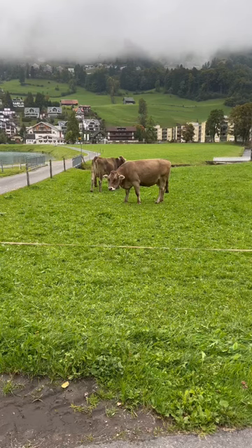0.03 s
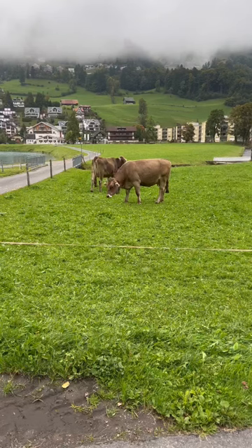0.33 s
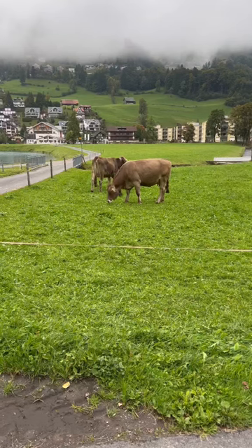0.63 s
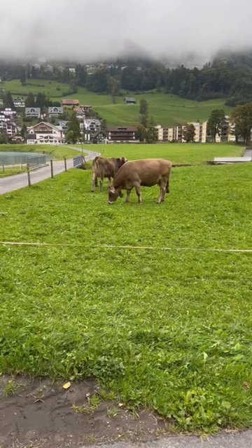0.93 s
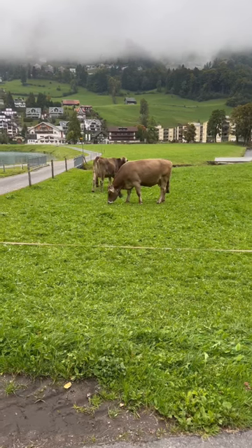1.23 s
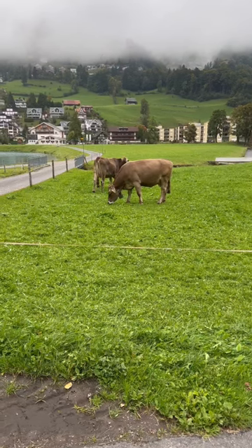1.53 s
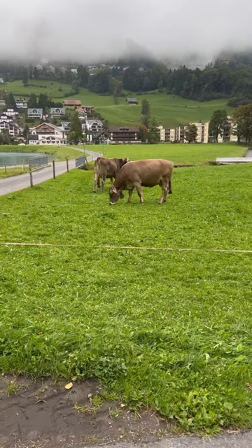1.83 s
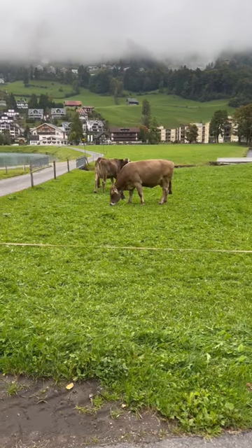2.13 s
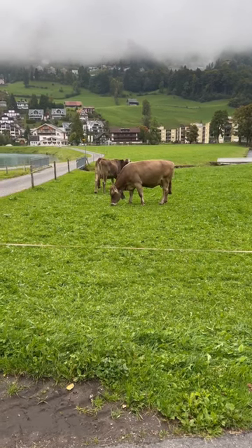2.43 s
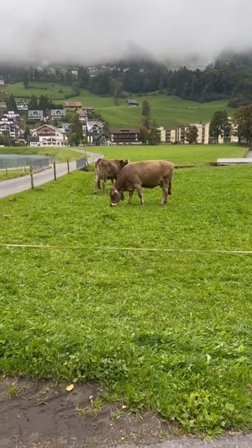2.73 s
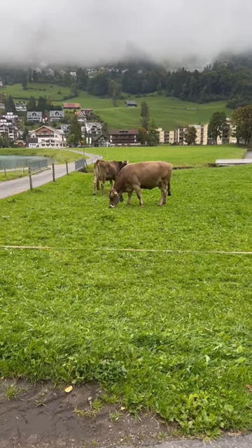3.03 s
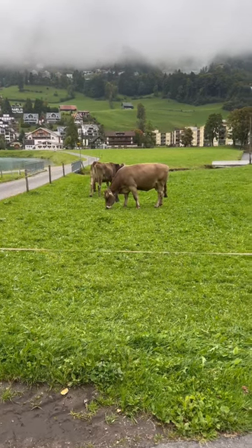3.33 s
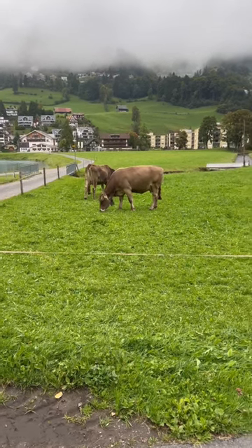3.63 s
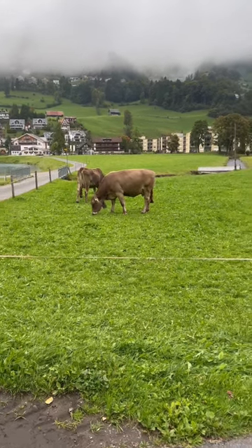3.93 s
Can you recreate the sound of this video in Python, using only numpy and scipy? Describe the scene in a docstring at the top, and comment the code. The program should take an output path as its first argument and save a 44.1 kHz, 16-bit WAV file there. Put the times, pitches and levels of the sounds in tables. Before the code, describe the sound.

Several metal bells on grazing cows clonk and jangle unevenly over faint outdoor air.

```python
"""An open meadow, where grazing cows clank their sheet-metal bells as they move their heads. Each clapper
impact sets the air in the bell's cavity sounding, a short hollow clonk, and excites the damped normal modes of
the shell: a long ring and a bright sizzle of high modes. More bells tinkle far off, and the surroundings
scatter a faint echo. Underneath lie steady air, a low valley rumble and light gusts on the microphone."""
import sys
import numpy as np
from scipy import signal
from scipy.fft import rfft, irfft, next_fast_len
from scipy.io import wavfile

SR = 44100
rng = np.random.default_rng(int(sys.argv[2]) if len(sys.argv) > 2 else 0)


def file_out(sig):
    """Save sig as 16-bit WAV at sys.argv[1]."""
    # one column per channel
    cols = np.atleast_2d(sig).T
    # limit, then scale
    lim = np.clip(cols, -1, 1)
    pcm = np.round(lim * 32767).astype(np.int16)
    wavfile.write(sys.argv[1], SR, pcm)


N = 176400

# Noise spectra: f/Hz, relative spectral level/dB
AIR_SPECTRUM = [(230, -1.5), (450, -12.5), (1000, -21), (5000, -27.5), (10000, -39), (16000, -58)]
RUMBLE_SPECTRUM = [(20, -38), (50, 2.5), (72, -0.5), (120, -2), (300, -17.5)]
GUST_SPECTRUM = [(20, -19), (65, 3.5), (110, -6.5), (250, -31.5), (700, -100)]
CRACK_SPECTRUM = [(400, -17), (3000, -6.5), (11000, -3.5), (16000, -25)]
# Gusts: t/s, Gaussian half width/s, level/dB
WIND_GUSTS = [(2.866, 0.12, -28), (3.025, 0.021, -29.5), (3.196, 0.066, -29), (3.808, 0.018, -26),
              (3.984, 0.011, -24)]
# Decay of the scattered echo: f/Hz, T60/s
ECHO_DECAY = [(300, 0.071), (2500, 1), (15000, 0.16)]
# Spectral envelope of a shell's weak upper modes: f/Hz, relative level/dB
FINE_SPECTRUM = [(1300, -16), (3000, -28.5), (6000, -26.5), (9000, -22), (11500, -30.5), (13500, -32),
                 (16000, -45)]
# Normal modes of each bell: f/Hz, relative level/dB, T60/s before the bell's sustain factor
MAIN_MODES = [(646, -4, .19), (1339, -18, .9), (1555, -9, .16), (1637, -15.5, 1.3), (1806, -14.5, .9),
              (2706, 0, 1.42), (2824, -8, .7), (2940, -7, .55), (3084, -13, .35), (3160, -12, .4),
              (4287, -13, .55), (4438, -11, .45), (4641, -16, .4), (5862, -16.5, .38), (6196, -10, .32),
              (6686, -12, .22), (11800, -20, .19)]
BRIGHT_MODES = [(697, -15, .22), (1432, -24, 1), (1771, -15, 1.18), (2899, 0, 1.2), (3045, -15, 1),
                (3482, -18, 1), (3789, -11, .66), (4577, -10.5, .72), (5004, -11, .57), (5084, -13, .53),
                (6521, -9, .53), (6640, -10, .5), (7195, -13, .55), (7778, -16, .5), (9365, -12, .14),
                (12620, -22, .25)]
TINNY_MODES = [(755, -10, .27), (1841, -9, .42), (2186, -14, .5), (2956, -14, .67), (3676, -13, .5),
               (4543, -10, .51), (5011, -2, .42), (6766, -6, .33)]
SMALL_MODES = [(834, -9, .55), (2090, -12, .92), (3246, 0, .81), (4244, -9, .67), (5197, -10, .71),
               (5865, -9, .65), (7221, -5, .36), (7782, -5, .34), (11300, -11, .25)]
FAINT_MODES = [(548, -8, .15), (1908, 0, .6), (2239, -10, .7), (3240, -3, 1)]
DEEP_MODES = [(489, 0, .19), (2643, -10, .7), (2761, -16, .72), (3725, -10, .62), (4123, -12, .46)]
# Clapper blows: t/s, clonk level/dB, ring level/dB, sizzle level/dB, f/Hz of the modes favoured
# by the point of impact; on the main bell also level/dB of the prime tone, its strongest mode
MAIN_STRIKES = [(.484, -29, -26, -17, [1555, 1637, 6686], -17.5), (.982, -21, -28, -29, [2824, 4641], -29),
                (1.252, -41, -29, -34, [], -35), (1.607, -23, -28, -31, [], -30), (2.008, -50, -37, -28, [],
                -42), (2.032, -14.5, -23, -21, [2940, 6196], -19.5),
                (2.423, -22, -27, -40, [1806, 2940, 4287], -40), (2.512, -43, -38, -38, [], -36),
                (2.544, -20, -30, -26, [1637, 6196], -24.5), (2.902, -36, -30, -31, [4287], -28.5),
                (3.341, -46, -35, -31, [], -42), (3.372, -14.5, -24, -18, [2824, 4287, 4641], -20.5),
                (3.786, -27, -37, -33, [], -28)]
BRIGHT_STRIKES = [(.094, -32, -26, -25, [5004]), (.306, -49, -39, -32, [3789]), (.971, -44, -36, -23, []),
                  (.991, -24, -28, -29, [6640]), (1.431, -27, -34, -31, [7778]),
                  (1.815, -28, -29, -17.5, [3045, 7195]), (1.953, -45, -37, -33, [3789]),
                  (2.269, -31, -40, -32, []), (2.724, -31, -32, -26, [3789, 7195]),
                  (2.792, -35, -34, -30, []), (3.146, -19, -28, -28, [7195]),
                  (3.568, -36, -39, -29, [9365]), (3.597, -30, -35, -27, [5004, 7195])]
TINNY_STRIKES = [(.132, -21, -25.5, -22, [5011]), (.533, -35, -28.5, -23, []), (.92, -24, -32, -36.5, []),
                 (1.204, -32, -48, -38.5, []), (1.338, -46, -33.5, -48, []),
                 (1.523, -34, -39, -39.5, [5011]), (1.953, -31, -38, -32, []), (2.867, -31, -33, -39, []),
                 (3.214, -42, -33, -34, [4543]), (3.672, -34.5, -35.5, -35, [])]
SMALL_STRIKES = [(.115, -21.5, -59, -36, []), (.555, -38, -51, -35.5, [5865]),
                 (0.849, -38, -38.5, -39, [7782]), (1.275, -30.5, -33, -32, [11300]),
                 (1.663, -42, -42.5, -35.5, [5865]), (2.377, -35, -35, -37, [11300]),
                 (2.615, -47, -36.5, -40, []), (3.146, -36, -44, -33.5, [])]
FAINT_STRIKES = [(1.888, -32, -38, -57, []), (2.135, -32.5, -33, -33, [])]
DEEP_STRIKES = [(3.897, -29, -36, -35, [])]
# Registers of a blow: f/Hz of the clonk, the ring's lower and upper edge, and the sizzle
REGISTERS = [800, 1300, 2900, 8000]
# The clapper rests on the main bell's rim and checks its strongest modes: t/s, level change/dB
RIM_CHOKES = [(3.432, -8)]
# Phase between the microphone ports: f/Hz, lead of the left/rad
PORT_PHASE = [(300, 0), (650, -1.07), (1100, -0.85), (1850, -0.17), (2700, -0.74), (3800, 1), (5800, -0.97),
              (10000, -1.26)]

AIR_DB, RUMBLE_DB, ECHO_DB, FAR_BELLS_DB = -43.5, -38.5, -14, -49.5
RISE_S, RISE_SLOPE = 0.0012, 0.24  # build-up of a mode at 2.7 kHz; slower for low modes
FINE_T60_S, FINE_SLOPE, FINE_ATTACK_S = .32, .6, 0.00024  # T60 at 6 kHz
CRACK_DB, CRACK_T60_S = -3, 0.029
REBOUND_S, REBOUND_DB = .02, -8.5
FAVOUR_DB, CHOKE_ABOVE_DB = 8, -7
SCATTER_DB, FINE_SCATTER_DB = 1.0, 6  # random spread of a mode's level from blow to blow
CLONK_PAN_DB, CENTRED_ABOVE_HZ = -4, 5100  # pan is left minus right
START_S, FADE_S, TOP_HZ = 0.033, 0.002, 16400


def amp(db):
    """Amplitude ratio of a level in decibels."""
    return 10 ** (np.asarray(db) / 20)


def unit_rms(x):
    """Normalisation to an rms of 1."""
    return x / np.sqrt(np.mean(x ** 2) + 1e-20)


def along(points, hz):
    """Interpolation of (f/Hz, value) points on a logarithmic frequency axis."""
    f, values = np.transpose(points)
    return np.interp(np.log(hz + 1), np.log(f + 1), values)


def filtered(x, response):
    """Linear filtering: the spectrum is multiplied by a complex frequency response."""
    size = next_fast_len(N + SR // 2)
    return irfft(rfft(x, size) * response(np.fft.rfftfreq(size, 1 / SR)), size)[..., :N]


def noise(spectrum):
    """Spectral shaping of white noise, at an rms of 1."""
    return unit_rms(filtered(rng.standard_normal(N), lambda hz: amp(along(spectrum, hz))))


def waver(db, per_s):
    """Random amplitude modulation: a gain of the given depth and speed."""
    position = np.arange(N) * per_s / SR
    knots = amp(db * rng.standard_normal(int(position[-1]) + 2))
    return np.interp(position, np.arange(len(knots)), knots)


def add(track, s, sound):
    """Superposition of a sound on a track from time s."""
    part = track[max(round(s * SR), 0):][:len(sound)]
    part += sound[:len(part)]


def valley_rumble():
    """Stationary noise with its energy concentrated at low frequencies."""
    return amp(RUMBLE_DB) * noise(RUMBLE_SPECTRUM + [(800, -100)])


def wind_gusts():
    """Pressure fluctuations of wind on the microphone: low noise under Gaussian envelopes."""
    t = np.arange(N) / SR
    envelope = sum(amp(db) * np.exp(-.5 * ((t - s) / width) ** 2) for s, width, db in WIND_GUSTS)
    return envelope * noise(GUST_SPECTRUM)


def valley_air():
    """Partly coherent noise: one part shared by both channels in phase, about 2 dB louder on the left, a weaker
    part independent."""
    spectrum = [(30, -29)] + AIR_SPECTRUM
    shared = noise(spectrum) * amp([[1], [-1]])
    independent = np.array([noise(spectrum), noise(spectrum)])
    return amp(AIR_DB) * (shared + amp(-15.5) * independent)


def meadow_echo(x):
    """Scattering from ground, fences and houses: convolution with exponentially decaying noise."""
    hz, t, spectra = signal.stft(rng.standard_normal((2, SR // 2)), SR, nperseg=256)
    decay = amp(-60 * t / along(ECHO_DECAY, hz)[:, None])
    tail = signal.istft(spectra * decay, SR, nperseg=256)[1]
    return amp(ECHO_DB) * signal.fftconvolve(x, tail / np.linalg.norm(tail[0]), axes=1)[:, :N]


def far_bells(count=4, blows=7):
    """Geometric similarity: distant bells of other sizes, struck at random, share frequency ratios."""
    out = np.zeros(N)
    for scale in rng.uniform(0.94, 1.08, count):
        times = np.sort(rng.uniform(0, N / SR, blows))
        gains = amp(FAR_BELLS_DB + 2.5 * rng.standard_normal(blows))
        for hz, db, t60 in SMALL_MODES[:8]:
            out += damped_mode(hz * scale, t60, times, gains * amp(db / 2))
    return out


def damped_mode(hz, t60, times, gains, chokes=()):
    """A damped oscillator: each blow adds energy to what still rings; a choke takes some away."""
    kicks, state, last = np.zeros(N, complex), 0j, 0
    rate = 2j * np.pi * hz - np.log(1000) / max(t60, .02)
    contacts = [(s, gain, 0) for s, gain in zip(times, gains)] + [(s, 0, db) for s, db in chokes]
    for (s, gain, loss_db), turn in zip(sorted(contacts), rng.random(len(contacts))):
        i = min(round(s * SR), N - 1)
        state *= np.exp(rate * (i - last) / SR)
        # in quadrature with the ringing, so that the energies add
        angle = np.angle(state) + np.pi / 2 * np.sign(turn - .5) if last else 2 * np.pi * turn
        kick = gain * np.exp(1j * angle) + state * (amp(loss_db) - 1)
        kicks[i] += kick
        state, last = state + kick, i
    rise = np.exp(-1 / (SR * RISE_S * (hz / 2700) ** -RISE_SLOPE))
    poles = [np.exp(rate / SR), rise * np.exp(2j * np.pi * hz / SR)]
    return signal.lfilter([1 - rise], np.poly(poles), kicks).real


def excitation_db(hz, blow):
    """Excitation spectrum of an impact, interpolated between its three registers."""
    clonk_db, ring_db, sizzle_db = blow[1:4]
    return np.interp(np.log(hz), np.log(REGISTERS), [clonk_db, ring_db, ring_db, sizzle_db])


def sizzle(hz, gains):
    """Frequency-dependent damping: the higher a thin shell's weak modes lie, the faster they fade."""
    t = np.arange(SR // 3) / SR
    t60 = FINE_T60_S * (hz[:, None] / 6000) ** -FINE_SLOPE
    phase = rng.uniform(0, 2 * np.pi, (len(hz), 1))
    partials = np.sin(2 * np.pi * hz[:, None] * t + phase) * amp(-60 * t / t60)
    attack = 1 - np.exp(-t / FINE_ATTACK_S)
    release = np.minimum(10 * (1 - t / t[-1]), 1)
    return gains @ partials * attack * release


def clapper_impacts(blows, fine_db, count=32):
    """Impact and rebound: each of the two contacts excites the weak upper modes and a noisy crack."""
    out, t = np.zeros(N), np.arange(SR // 8) / SR
    fine_hz = 1800 + 14400 * (np.arange(count) + rng.random(count)) / count
    scrape = unit_rms(noise(CRACK_SPECTRUM) * waver(db=5, per_s=350))  # the contact catches and slips
    for blow in blows:
        fine_levels = fine_db + along(FINE_SPECTRUM, fine_hz) + excitation_db(fine_hz, blow)
        crack_envelope = amp(CRACK_DB + np.mean(blow[2:4]) - 60 * t / CRACK_T60_S)
        rebound_at = blow[0] + REBOUND_S * rng.uniform(.5, 1.8)
        for s, db in [(blow[0], 0), (rebound_at, REBOUND_DB)]:
            scatter = FINE_SCATTER_DB * rng.standard_normal(count)
            add(out, s, sizzle(fine_hz, amp(db + fine_levels + scatter)))
            start = rng.integers(N - len(t))
            add(out, s, amp(db) * crack_envelope * scrape[start:start + len(t)])
    return out


def cowbell(modes, blows, sustain, fine_db, pan_db, chokes=()):
    """Modal superposition: the shell sounds as the sum of its modes, weighted by the point of impact."""
    times, mode_hz = [blow[0] for blow in blows], np.array(modes)[:, 0]
    favoured = [[np.argmin(abs(mode_hz - hz)) for hz in blow[4]] for blow in blows]
    out = np.zeros((2, N))
    for k, (hz, db, t60) in enumerate(modes):
        is_prime = db == 0
        levels = np.array([b[5] if is_prime and b[5:] else excitation_db(hz, b) for b in blows])
        levels += [FAVOUR_DB * (k in indices) for indices in favoured]
        gains = amp(db + levels + SCATTER_DB * rng.standard_normal(len(blows)))
        if k == 0:  # the hollow clonk is rough
            pan, modulation = CLONK_PAN_DB, waver(db=3.5, per_s=110)
        else:  # the other modes swell and fade as the bell turns
            pan, modulation = pan_db * (hz < CENTRED_ABOVE_HZ), waver(db=2.3, per_s=9)
        ring = damped_mode(hz, sustain * t60, times, gains, chokes if db > CHOKE_ABOVE_DB else ())
        out += unit_rms(amp([[pan / 2], [-pan / 2]])) * modulation * ring
    return out + clapper_impacts(blows, fine_db)


def scene():
    """Superposition of six near bells, the far herd, their echo and the open air."""
    bells = (cowbell(MAIN_MODES, MAIN_STRIKES, sustain=1.02, fine_db=-1.5, pan_db=0.5, chokes=RIM_CHOKES)
             + cowbell(BRIGHT_MODES, BRIGHT_STRIKES, sustain=0.77, fine_db=-0.5, pan_db=-5)
             + cowbell(TINNY_MODES, TINNY_STRIKES, sustain=0.63, fine_db=-3, pan_db=-12)
             + cowbell(SMALL_MODES, SMALL_STRIKES, sustain=0.78, fine_db=5, pan_db=-15)
             + cowbell(FAINT_MODES, FAINT_STRIKES, sustain=0.72, fine_db=-8, pan_db=-7)
             + cowbell(DEEP_MODES, DEEP_STRIKES, sustain=1.0, fine_db=4, pan_db=-4)
             + far_bells())
    return bells + meadow_echo(bells) + valley_rumble() + wind_gusts() + valley_air()


def record(dry):
    """Phase difference between two microphone ports, with a band limit and a brief fade at each end."""
    t = np.arange(N) / SR
    gate = np.clip(np.minimum(t - START_S, t[-1] - t) / FADE_S, 0, 1)
    ports = lambda hz: np.exp(.5j * along(PORT_PHASE, hz) * np.array([[1], [-1]])) * (hz < TOP_HZ)
    return filtered(dry * gate, ports)


dry = scene()
out = record(dry)
file_out(out)
```